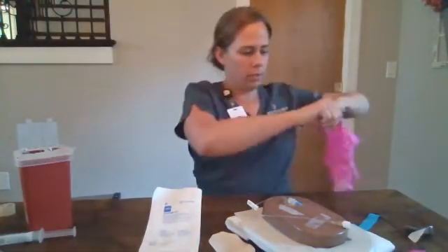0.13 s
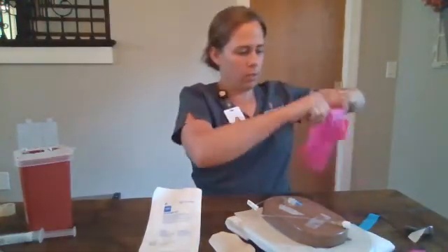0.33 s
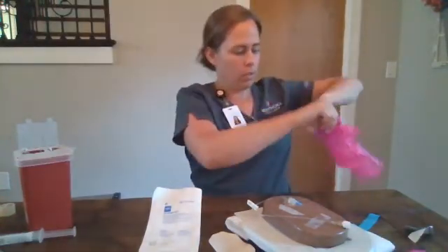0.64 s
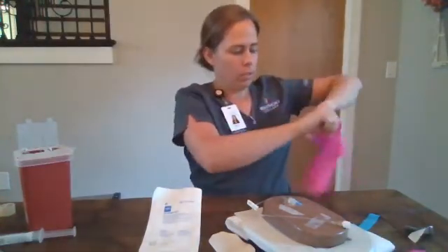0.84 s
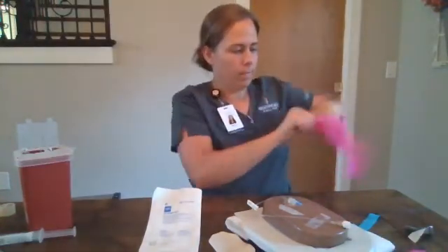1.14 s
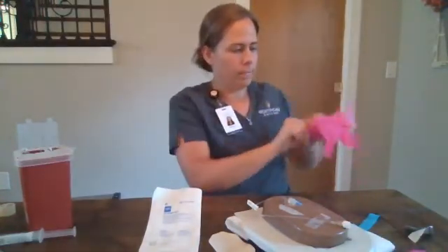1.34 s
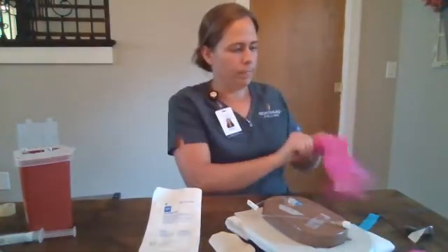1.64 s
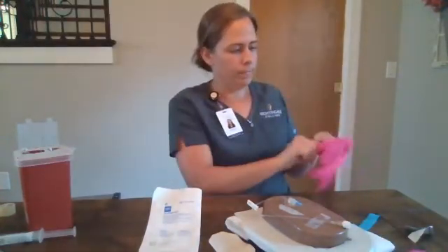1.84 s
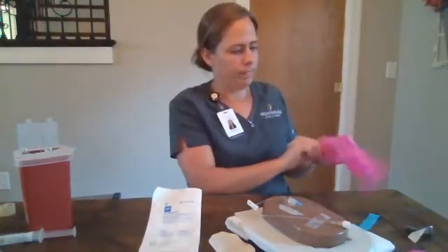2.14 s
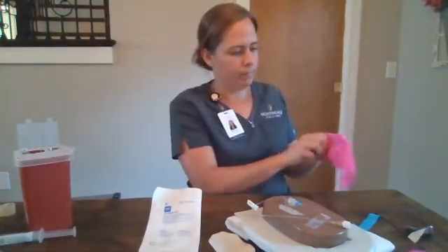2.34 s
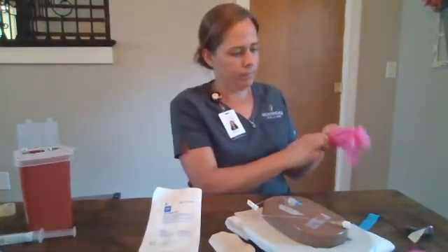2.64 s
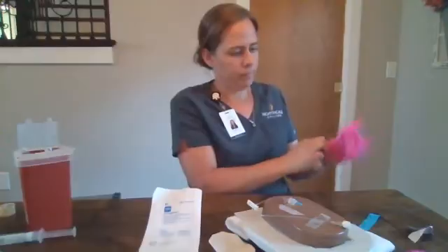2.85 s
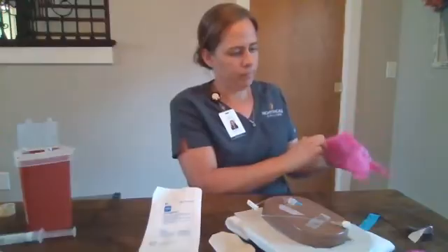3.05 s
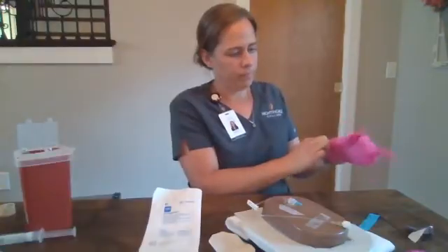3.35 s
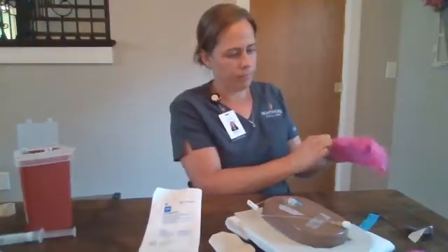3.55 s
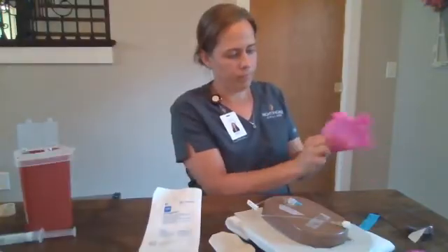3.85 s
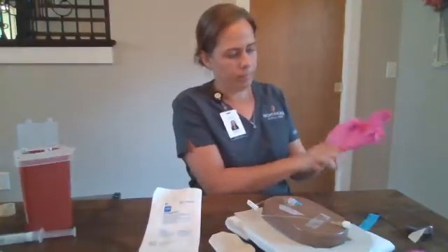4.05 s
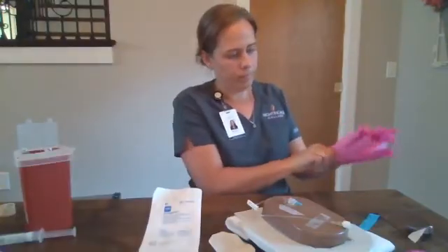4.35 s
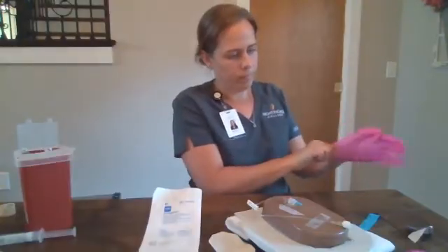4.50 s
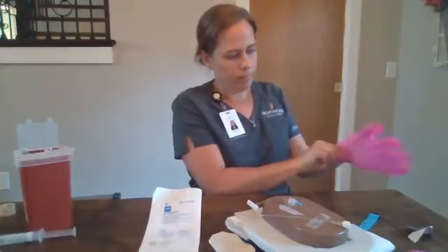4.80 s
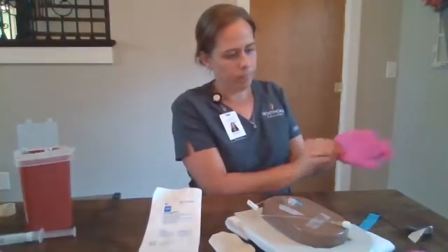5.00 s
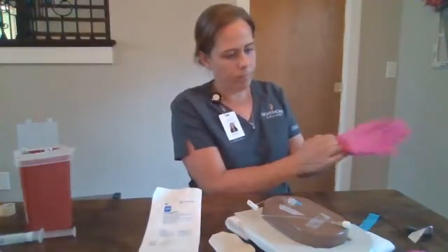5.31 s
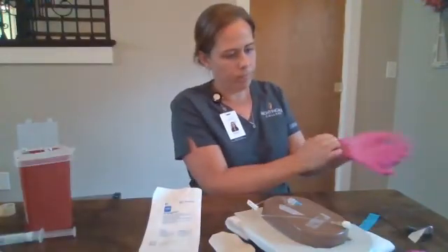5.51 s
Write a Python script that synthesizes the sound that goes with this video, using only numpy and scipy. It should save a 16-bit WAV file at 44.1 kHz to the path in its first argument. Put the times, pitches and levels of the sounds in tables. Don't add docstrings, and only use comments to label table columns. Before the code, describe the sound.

A quiet hard-walled room carries a faint wash of ventilation and low hum, heard by a camera microphone about two metres away. Sharp snaps of thin rubber open the scene at 0.05 and 0.2 s, then light rustling and another snap at 0.8 s. A tiny squeak comes at 1.2 s, followed by crackles and pops from 1.3 to 1.7 s. At 1.9 s the loudest snap cracks with a dull air thump, echoes and a trembling tail, while bubbles slip out until 2.25 s. From 2.5 s the glove sounds closer and drier: dense crackle and a hollow thump around 2.7-3.0 s, a low groan at 3.5 s, a short chatter at 3.65 s. Pops and flicks cluster at 4.0-4.5 s, with a bright tick at 4.54 s. After a sparser lull, a vigorous burst of snaps, thumps and ticks fills 5.15-5.55 s, then fades.

```python
import sys
import numpy as np
from scipy import signal
from scipy.fft import rfft, irfft
from scipy.io import wavfile
from scipy.ndimage import uniform_filter1d

SR = 44100
rng = np.random.default_rng(int(sys.argv[2]) if len(sys.argv) > 2 else 0)


def materialize(psi):
    bounded = np.clip(np.atleast_2d(psi).T, -1, 1)
    quanta = np.round(bounded * 32767).astype(np.int16)
    wavfile.write(sys.argv[1], SR, quanta)


def to_linear_factor(level_db):
    exponent = np.asarray(level_db, float) / 20
    return 10 ** exponent


N = 250047

# (frequency [Hz], level per Hz [dB])
FILM = [(530, -30), (900, 15), (2030, 10.5), (2560, 6), (3650, -3.5), (4070, -3), (5390, -11.5),
        (10400, -9), (15000, -7), (15900, -15), (16500, 7.5)]
SLACK_HIGH_DB = -25
IDLE_CRACKLE_DB, IDLE_HISS_DB, IDLE_FLUTTER_DB = -71.5, -60.5, -71.5


def evened(x):
    return x / np.sqrt(np.mean(x ** 2) + 1e-20)


def peaked(x, db):
    return to_linear_factor(db) * x / abs(x).max()


def add(mix, s, sound):
    part = mix[round(s * SR):][:len(sound)]
    part += sound[:len(part)]


def read(points, hz):
    f, value = np.transpose(points)
    return np.interp(np.log(hz + 1), np.log(f + 1), value)


def coloured(x, points):
    return irfft(rfft(x) * to_linear_factor(read(points, np.fft.rfftfreq(len(x), 1 / SR))), len(x))


def above(x, hz):
    return signal.sosfilt(signal.butter(4, hz, "high", fs=SR, output="sos"), x)


def resonate(x, hz, width):
    carrier = np.exp(2j * np.pi * np.cumsum(hz * np.ones(len(x))) / SR)
    r = np.exp(-np.pi * width / SR)
    return 2 * (carrier * signal.lfilter([1 - r], [1, -r], x / carrier + 1e-18)).real


def fuzzy(hz, width):
    return evened(resonate(resonate(rng.standard_normal(N), hz, width), hz, 3 * width))


def clicks(per_s, spread_db):
    size = to_linear_factor(spread_db * np.minimum(rng.exponential(1, N), 4)) * rng.choice([-1., 1.], N)
    return evened(size * (rng.random(N) < per_s / SR))


def swells(s, swell_s, db):
    late = (np.arange(0, N + 64, 64) / SR - s[:, None]) / abs(swell_s)[:, None]
    return to_linear_factor(2 * (db[:, None] - 14.5 * abs(late) ** 1.83))


def stretched(power):
    return np.sqrt(np.interp(np.arange(N) / 64, np.arange(len(power)), power))


def ventilation():
    # (frequency [Hz], level per Hz [dB])
    air = [(15, -31), (25, -20), (58, -34), (150, -5), (273, -7), (339, -25), (378, -5), (617, -9.5),
           (766, -16.5), (1120, -10.5), (2820, -16.5), (6550, -25), (7710, -70), (14800, -19.5),
           (16500, -55)]
    # (time [s], level [dB])
    draughts = [(.25, -59), (.55, -58.5), (.79, -70), (1.36, -63), (1.96, -56.5), (2.19, -60), (2.504, -49),
                (3.06, -52), (3.63, -60), (3.95, -59), (4.48, -62), (4.87, -62), (5.56, -57.5)]
    s, db = np.transpose(draughts)
    still_db = -69
    stirred = stretched(swells(s, 0.066 + 0 * s, db).sum(0) + to_linear_factor(2 * still_db))
    wander = evened(sum(np.sin(2 * np.pi * (f * np.arange(N) / SR + rng.random()))
                        for f in np.geomspace(.8, 5, num=8)))
    wash = evened(coloured(rng.standard_normal(N), air))
    low = wash - signal.filtfilt(*signal.butter(2, 115, "high", fs=SR), wash)
    rumble = to_linear_factor(-69 + 4 * wander) * evened(above(low, 36))
    hum = to_linear_factor(-66.5) * fuzzy(150.7, 11.8)
    standing = to_linear_factor(-3.5) * stirred * fuzzy(332, 8.4)
    return to_linear_factor(-65 + wander) * above(wash, 48.0) + hum + rumble + standing


def creases():
    # (time [s], peak level [dB], low ring [Hz], high ring [Hz], bright tick [dB])
    taut_flips = [(0.0536, -26, 4360, 6230, -5.5), (0.22, -25.5, 2350, 5000, -7.5),
                  (0.375, -47, 2460, 4670, -3.5), (0.549, -54, 2370, 5500, -2.5),
                  (0.7916, -30.5, 2960, 5590, -11), (1.3102, -47, 2600, 4450, -39),
                  (1.4575, -35.5, 2230, 6530, -4), (1.913, -15, 3010, 3890, -10),
                  (2.111, -44.5, 2620, 4180, -3.5), (2.496, -46.5, 2850, 3540, -19),
                  (2.526, -46.5, 1950, 4150, -9), (2.7685, -47, 2860, 4100, -17),
                  (2.9085, -46, 2000, 4540, -24), (3.1354, -38.5, 3150, 3470, -19),
                  (3.219, -36, 2170, 3550, -15), (3.4052, -37, 3440, 3040, -12.5),
                  (4.282, -48, 2430, 5300, -5), (4.338, -40, 2660, 3900, -7.5),
                  (4.3504, -32, 2530, 3380, -32), (4.4047, -38, 2410, 3670, -12),
                  (4.456, -37.5, 2760, 3570, -9), (4.5893, -49.5, 1430, 4360, 2),
                  (5.1455, -30.5, 1560, 3250, -12.5), (5.449, -44, 3060, 4260, -23)]
    # (time [s], peak
    # level [dB], ring [Hz], bright tick [dB])
    slack_pops = [(0.574, -39, 2520, -22), (0.9103, -55, 3180, -2), (1.055, -50, 3000, -1.5),
                  (1.305, -43, 2540, -45), (1.458, -29.5, 2900, -40), (1.6007, -36.5, 2780, -17),
                  (1.703, -24.5, 3480, -31), (1.7101, -27.5, 3000, -50), (1.831, -44, 3040, -6.5),
                  (2.4828, -56.5, 2710, 1.5), (2.7046, -26.5, 2740, -46), (2.9617, -31, 3140, -28),
                  (3.1814, -32.5, 3300, -15.5), (3.318, -46.5, 2500, -16), (3.6012, -35.5, 2650, -13),
                  (3.775, -29, 3440, -8), (3.917, -39, 3330, -42), (4.013, -37, 3080, -10.5),
                  (4.0333, -45, 2480, -11), (4.115, -34.5, 2670, -39), (4.1876, -40.5, 2800, -19),
                  (4.2107, -35, 3040, -38), (4.303, -43, 2420, -11), (4.377, -32.5, 2590, -10.5),
                  (4.5437, -42, 2150, -3), (5.164, -26, 2320, -35), (5.2283, -26.5, 2950, -38),
                  (5.2661, -19, 1500, -18), (5.4604, -33, 3400, -17.5), (5.5148, -31.5, 3110, -9)]
    taut = [(s, db, low, high, -5, tick, -3.5) for s, db, low, high, tick in taut_flips]
    slack = [(s, db, hz, hz * 1.35, SLACK_HIGH_DB, tick, -42) for s, db, hz, tick in slack_pops]
    return taut + slack


def drag():
    # (time of hardest drag [s], swell [s], crackle level [dB],
    # crackle centre [Hz], fine hiss over crackle [dB])
    strokes = [(0.0, 0.029, -54, 5340, 11), (0.598, 0.067, -51, 2480, -4), (1.093, 0.049, -46, 2975, -2),
               (1.28, 0.12, -53.5, 2900, -6), (1.307, 0.0055, -40, 2940, -11), (1.718, 0.07, -46, 3330, 0),
               (1.848, 0.033, -45.5, 2970, -4), (2.028, 0.055, -36.5, 3490, 2),
               (2.22, 0.06, -52, 3240, 2.5), (2.51, 0.035, -45, 3080, -5), (2.768, 0.076, -36, 2760, -4.5),
               (2.88, 0.11, -44, 2540, -1), (2.967, 0.033, -34.5, 3030, -4), (3.06, 0.089, -66, 3020, 6),
               (3.2, 0.016, -45, 3470, -15), (3.51, 0.058, -55, 2290, -0.5), (3.631, 0.04, -38.5, 2854, -3),
               (3.668, 0.018, -47, 3070, -8), (4.019, 0.034, -40.5, 2980, -6),
               (4.116, 0.046, -46, 2530, -5), (4.22, 0.029, -50, 2880, 0), (4.39, 0.082, -44.5, 2670, -22),
               (4.744, 0.051, -55.5, 2510, 12.5), (4.77, 0.062, -50, 2630, 3),
               (5.16, 0.086, -46.5, 2930, -4.5), (5.289, 0.058, -28.5, 3176, 1.5)]
    s, swell_s, db, hz, hiss_db = np.transpose(strokes)
    at, peak_db, low_hz, high_hz, high_db, tick_db, after_db = np.transpose(creases())
    late = np.arange(0, N + 64, 64) / SR - at[:, None]
    settle_s, settle_db_per_s = 0.00064, 435
    settle = np.clip(late / settle_s, 0, 1) * to_linear_factor(2 * (peak_db[:, None] - settle_db_per_s * abs(late)))
    power = np.vstack([swells(s, swell_s, db), settle * to_linear_factor(2 * after_db)[:, None]])
    hiss_share = np.r_[to_linear_factor(2 * hiss_db), to_linear_factor(2 * (tick_db - after_db + 8.5))]
    hiss = hiss_share @ power + to_linear_factor(2 * IDLE_HISS_DB)
    idle = to_linear_factor(2 * IDLE_CRACKLE_DB)
    total = power.sum(0) + idle
    ring_hz = np.r_[hz, np.where(high_db > -12, high_hz, low_hz)]
    centre = (ring_hz @ power + 2930 * idle) / total
    return stretched(total), stretched(centre) ** 2, stretched(hiss)


def rubbing():
    # (time of hardest push [s], swell [s], flutter level [dB])
    squeezes = [(0.07, 0.024, -42), (.23, 0.028, -48), (.55, 0.1, -56.5), (.83, 0.049, -46),
                (1.09, 0.032, -49.5), (1.468, 0.016, -37.5), (1.73, 0.066, -42.5), (1.95, 0.049, -38.5),
                (2.05, 0.057, -44.5), (2.13, 0.012, -46), (2.22, 0.066, -56), (2.51, 0.036, -54),
                (2.774, 0.091, -43.5), (2.945, 0.094, -34), (3.05, 0.07, -47), (3.188, 0.057, -38.5),
                (3.3, 0.26, -51.5), (3.42, 0.022, -47.5), (3.55, 0.11, -54.5), (3.65, 0.058, -41),
                (3.783, 0.022, -37.5), (4.03, 0.025, -48.5), (4.109, 0.029, -44.5), (4.25, 0.15, -49),
                (4.419, 0.11, -40.5), (4.78, 0.15, -53.5), (5.16, 0.044, -42), (5.287, 0.076, -29),
                (5.461, 0.072, -38), (5.528, 0.022, -33)]
    # (ratio to the centre [times], level [dB])
    patches = [(.58, -8.5), (.72, 1.5), (.86, 1.5), (1.0, -2), (1.17, -3), (1.4, -0.5), (1.7, -2),
               (2.05, 3)]
    # (frequency [Hz], level [dB])
    hollows = [(470, 1.5), (610, 11.5), (760, -0.5), (1150, 3.5)]
    crackle_gain, hz, hiss_gain = drag()
    flutter_gain = stretched(swells(*np.transpose(squeezes)).sum(0) + to_linear_factor(2 * IDLE_FLUTTER_DB))

    slips, patch = clicks(per_s=1500., spread_db=3.8), rng.integers(0, 4, N)
    retune_s, retune_share = .04, .05
    moment = np.minimum(np.arange(N) / SR / retune_s, 999).astype(int)
    shifts = rng.standard_normal((1000, len(patches)))[moment].T
    tuned = hz * (1 + retune_share * shifts)
    sides = [resonate(slips * (patch % 2 == k), hz, 2560) for k in range(2)]
    rings = sum(to_linear_factor(db) * resonate(sides[k % 2], tuned[k] * ratio, 140)
                for k, (ratio, db) in enumerate(patches))
    crackle = evened(rings) + 0.13 * evened(coloured(slips, FILM))

    fine = clicks(per_s=7800.0, spread_db=-32.0)
    hiss = above(coloured(1.02 * slips + fine, FILM), 4200)
    pops = clicks(per_s=1300., spread_db=2.)
    flutter = sum(to_linear_factor(db) * resonate(resonate(pops * (patch == k), f, 290), f, 1140)
                  for k, (f, db) in enumerate(hollows))
    body = crackle_gain * evened(crackle) + flutter_gain * evened(flutter)
    return to_linear_factor(-10.0) * body + hiss_gain * evened(hiss)


def squeaks():
    # (start [s], length [s], level [dB], first pitch [Hz], last pitch [Hz])
    squeals = [
        (0.0088, 0.035, -65, 5500, 5310),
        (1.223, 0.066, -60.5, 1543, 1560),
        (3.515, 0.078, -55, 327, 459),
        (3.67, 0.023, -56, 2950, 2970),
        (5.641, 0.024, -70, 3520, 3700),
    ]
    out = np.zeros(N)
    for s, length, db, first_hz, last_hz in squeals:
        u = np.linspace(0, 1, round(length * SR))
        hz = first_hz + (last_hz - first_hz) * u
        waver = evened(resonate(rng.standard_normal(len(u)), hz, 110))
        tone = np.sin(2 * np.pi * np.cumsum(hz) / SR) + 0.84 * waver
        add(out, s, to_linear_factor(db) * np.sin(np.pi * u ** 1.37) * tone)
    return out


def snaps():
    out, t = np.zeros((2, N)), np.arange(-512, 1024) / SR
    flip = (1 - np.exp(-np.maximum(t, 0) / .0006)) * to_linear_factor(-60 * t / .007)
    creak = .065 * to_linear_factor(-60 * abs(t) / .027)
    motion = flip + creak
    for s, db, low_hz, high_hz, high_db, tick_db, _ in creases():
        z = rng.standard_normal(len(t))
        grit = z * abs(z)
        cracks = (grit + 12 * (abs(t - .0004) < .5 / SR)) * motion
        low = resonate(resonate(cracks, low_hz, 580), low_hz, 1400)
        low = peaked(low, db - 0.3 * (high_db - SLACK_HIGH_DB))
        high = resonate(resonate(cracks, high_hz, 0.12 * high_hz), high_hz, 5900)
        high = peaked(high, db + high_db + 6.0)
        wide = peaked(above(coloured(grit * motion, FILM), 1400), db - 5 + .4 * tick_db)
        tick = peaked(above(cracks, 12100), db + tick_db + 17.5)
        held_out = s > 2.3
        dry_row = int(high_db < -12 or held_out)
        add(out[dry_row], s + t[0] - .0003, low + high + wide + tick)
    return out


def thump(hz, db):
    t = np.arange(2048) / SR
    push = rng.standard_normal(len(t)) * to_linear_factor(-60 * t / 0.024)
    push[[0, round(SR / hz)]] += 6, 9
    t60 = 12 / hz
    return peaked(resonate(resonate(push, hz, 1.75 / t60), hz, 780), db - 1)


def thumps():
    # (time [s], peak level [dB], ring [Hz])
    pocket_pops = [(0.054, -34.5, 506), (0.22, -49.5, 342), (0.791, -44, 1000), (0.877, -45, 586),
                   (1.458, -41.5, 545), (1.709, -37, 846), (1.912, -22, 640), (2.047, -36, 627),
                   (2.116, -41, 670), (2.186, -38, 467), (2.726, -38.5, 670), (2.869, -41, 610),
                   (2.926, -24.5, 602), (3.18, -36.5, 408), (3.219, -34, 535), (3.405, -44, 930),
                   (3.6, -32, 556), (4.103, -49, 570), (4.211, -44, 646), (4.275, -43.5, 655),
                   (4.334, -39.5, 616), (4.376, -39.5, 480), (4.407, -35.5, 707), (4.454, -30, 687),
                   (4.755, -43, 438), (5.157, -34, 504), (5.264, -32, 533), (5.424, -36.5, 507),
                   (5.449, -30, 592), (5.514, -26.5, 523)]
    out = np.zeros(N)
    for s, db, hz in pocket_pops:
        add(out, s, thump(hz, db))
    return out


def shivers():
    # (time [s], level [dB], band centre [Hz], band width [Hz], decay t60 [s])
    trembles = [(0.056, -61, 6430, 1000, 0.55), (0.806, -55.5, 1150, 230, 0.3),
                (1.465, -53, 2600, 795, 0.29), (1.922, -44, 2580, 500, 0.8), (1.922, -42, 4270, 870, 1),
                (1.925, -54, 1400, 360, 0.51), (3.6, -51, 3610, 350, 0.044), (3.922, -61, 3400, 200, 0.36),
                (4.1, -52.5, 2900, 140, 0.14), (4.455, -54, 1490, 313.2, 0.2), (4.87, -61, 167, 37.96, 0.2),
                (5.262, -41, 760, 260, 0.21)]
    out, slips = np.zeros(N), clicks(per_s=7100.0, spread_db=6.5)
    t = np.arange(12000) / SR
    for s, db, hz, width, t60 in trembles:
        part = slips[round(s * SR):][:len(t)]
        band = evened(resonate(resonate(part, hz, width), hz, width))
        fade = np.minimum(t / 0.0012, 1) * signal.windows.tukey(2 * len(t), .6)[len(t):]
        add(out, s, to_linear_factor(db - 60 * t / t60) * fade * band)
    return out


def damped_rings(rows, trim_db):
    out, t = np.zeros(N), np.arange(4096) / SR
    for s, db, hz, t60 in rows:
        ring = np.sin(2 * np.pi * hz * t) + to_linear_factor(-10.5) * np.sin(2 * np.pi * 1.75 * hz * t)
        attack = 1 - np.exp(-t * hz / 1.17)
        add(out, s, peaked(ring * attack * to_linear_factor(-60 * t / abs(t60)), db + trim_db))
    return out


def cracks():
    # (time [s], peak level [dB], ring [Hz], decay t60 [s])
    fold_cracks = [(0.0635, -36, 4300, .006), (0.076, -33, 4200, 0.0056), (1.3105, -36, 3700, 0.0043),
                   (1.469, -34, 6300, 0.0065), (1.9135, -15, 3670, .003), (1.9175, -17, 4400, .006),
                   (1.9275, -23, 3900, .005), (3.1805, -27, 2600, 0.0018), (4.4565, -28.5, 2420, .003),
                   (5.146, -31, 2020, 0.0033), (5.1645, -26.5, 1540, 0.007), (5.188, -38, 3000, .004),
                   (5.266, -16.5, 2020, 0.0016), (5.281, -20.5, 1600, 0.0081),
                   (5.2845, -23.5, 1520, 0.0075), (5.3065, -27, 1620, .005)]
    return damped_rings(fold_cracks, trim_db=-2)


def flicks():
    # (time [s], peak level [dB], ring [Hz], decay t60 [s])
    freed = [(1.1837, -46, 2780, 0.008), (1.2585, -38.5, 2450, 0.008), (1.269, -40, 2400, 0.008),
             (1.2804, -37, 2680, 0.008), (1.2885, -39, 2230, 0.008), (1.3017, -31.5, 2480, 0.0076),
             (1.3102, -41, 2400, 0.011), (2.7214, -34, 2920, 0.008), (2.7374, -35, 4300, 0.008),
             (2.7434, -31.5, 3840, 0.007), (2.7724, -30, 2980, 0.008), (2.7804, -32, 3900, 0.008),
             (2.7854, -30, 3010, 0.008), (2.7934, -35, 2980, 0.0074), (2.8284, -45, 2840, 0.008),
             (2.9467, -34, 2870, 0.008), (2.9654, -36, 2920, 0.0096), (3.182, -37, 3730, 0.006),
             (3.2186, -40, 3560, 0.0065), (3.3019, -51, 2370, 0.008), (3.3603, -43, 2300, 0.0062),
             (3.4951, -52, 2930, 0.008), (3.5174, -49, 3370, 0.008), (3.6194, -39, 3330, 0.0091),
             (3.6391, -34, 3020, 0.011), (3.917, -28.5, 3330, 0.01), (3.9274, -55, 3330, 0.008),
             (4.0123, -33, 3240, 0.011), (4.0327, -37, 2300, 0.0099), (4.2314, -42, 3000, 0.008),
             (4.35, -28.5, 3770, 0.008), (4.376, -29.5, 2410, 0.011), (4.4059, -31, 3670, 0.008),
             (4.4304, -33.5, 2800, 0.0086), (4.6947, -46, 2320, 0.0068), (5.1564, -31, 2220, 0.0072),
             (5.1637, -25, 2220, 0.012), (5.2276, -31, 3270, 0.0079), (5.2824, -26, 3400, 0.008),
             (5.2864, -22, 3230, 0.0068), (5.3054, -33, 3200, 0.008), (5.3244, -34, 3650, 0.008),
             (5.4627, -31.5, 2980, 0.01)]
    return damped_rings(freed, trim_db=-2)


def chatters():
    # (start [s], length [s], peak level [dB], slip rate [per s], ring [Hz])
    cuff_runs = [
        (1.465, .014, -44, 500, 2900),
        (3.657, 0.019, -35, 430, 3050),
        (5.259, .008, -33, 540, 3050),
    ]
    # (ratio [times], width [Hz], level [dB])
    parts = [(1, 260, 0), (2.1, 700, -20), (.7, 300, -14), (1.22, 300, -9)]
    out = np.zeros(N)
    for s, length, db, per_s, hz in cuff_runs:
        z, slips = rng.standard_normal(40), np.zeros(4096)
        at = (np.arange(40) + .12 * z) / per_s
        inside = (at >= 0) & (at < length)
        growth = .6 + .5 * at[inside] / length
        slips[(at[inside] * SR).astype(int)] = growth * to_linear_factor(1.5 * z[::-1][inside])
        ring = sum(to_linear_factor(part_db) * evened(resonate(resonate(slips, k * hz, width), k * hz, 3 * width))
                   for k, width, part_db in parts)
        add(out, s, peaked(ring, db + 6.5))
    return out


def bubbles():
    # (time [s], peak level [dB], ring [Hz], decay t60 [s])
    escapes = [(1.467, -43.5, 541, .04), (2.031, -40, 708, .03), (2.063, -39, 580, .046),
               (2.086, -43, 636, .034), (2.094, -37, 500, .031), (2.134, -40, 704, 0.044),
               (2.177, -40, 416, .03), (2.196, -39, 458, 0.049), (2.234, -42, 674, .057),
               (2.254, -46.5, 636, .05), (2.884, -34, 580, .025), (2.918, -34, 603, .03),
               (2.94, -29, 703, .025), (2.946, -27.5, 606, .042), (2.954, -23, 447, 0.047),
               (2.967, -34, 410, .021), (3.567, -37, 412, .036), (3.594, -38, 514, 0.027),
               (4.185, -45, 608, .03), (4.258, -48, 585, .03), (4.303, -38.5, 564, .04),
               (4.419, -43, 496, 0.041), (4.434, -30.5, 467, 0.06), (4.585, -44.5, 634, 0.066),
               (4.789, -41.5, 508, .058), (5.136, -37, 600, .02), (5.206, -37.5, 520, .04),
               (5.284, -27, 547, 0.031), (5.302, -24, 540, 0.033), (5.324, -31, 640, .029),
               (5.461, -25, 550, 0.023), (5.52, -29.5, 420, 0.036), (5.535, -29.5, 554, .04)]
    return damped_rings(escapes, trim_db=-4)


def pricks():
    # (time [s], peak level [dB])
    peels = [(1.4695, -36), (2.7242, -44), (2.7804, -38), (2.8184, -45), (2.8304, -45), (2.8669, -41),
             (2.9083, -45), (2.9317, -45), (2.9894, -26), (3.0114, -51), (3.1793, -26), (4.3365, -36),
             (4.3755, -35), (4.4055, -38), (4.43, -44), (4.4553, -38), (4.5426, -19.5), (4.7257, -29),
             (4.901, -34), (4.9427, -38), (5.0884, -58), (5.1564, -42), (5.1642, -35), (5.2106, -46),
             (5.227, -44), (5.2445, -37), (5.3214, -32), (5.3384, -32), (5.3457, -19.5), (5.3814, -49),
             (5.4615, -45), (5.5144, -37)]
    out, t = np.zeros(N), np.arange(4096) / SR
    prick = above(np.cos(2 * np.pi * 21000 * t ** .5 * 0.072) * to_linear_factor(-60 * t / 0.0088), 11500)
    for s, db in peels:
        add(out, s, peaked(prick, db - 2))
    return out


def knocks():
    # (time [s], peak level [dB], ring [Hz])
    knuckles = [(1.909, -33.5, 416), (2.183, -46, 420), (2.96, -31.5, 420), (3.027, -43, 310),
                (3.404, -48.5, 248), (3.772, -55, 350), (4.205, -49, 252), (4.455, -39.5, 249),
                (4.777, -43, 281), (4.813, -50, 297), (5.35, -51, 223), (5.513, -29, 442)]
    out = np.zeros(N)
    for s, db, hz in knuckles:
        add(out, s, thump(hz, db))
    return out


def room(x):
    # (delay [s], level [dB])
    walls = [(.0035, -10), (.0052, -11), (.0102, -6.5), (.0141, -13), (.0225, -14), (.031, -18)]
    # (frequency [Hz], t60 [s])
    decay = [(250, 0.2), (1000, 0.27), (4000, 0.29), (9000, 0.47), (15000, 0.21)]
    early = np.zeros(2048)
    for s, db in walls:
        early[round(s * SR)] = to_linear_factor(db)
    dull = signal.lfilter([.7], [1, -.3], x)
    out = x + signal.oaconvolve(dull, early)[:N]
    turning = np.pi * 7 * np.arange(N) / SR
    blur_hz = 200
    for k in range(3):
        taps, slots = np.zeros(30000), np.arange(392, 29980, 12)
        taps[slots + rng.integers(0, 12, len(slots))] = rng.choice([-1., 1.], len(slots))
        hz, t, z = signal.stft(taps, SR, nperseg=256)
        tail = signal.istft(z * to_linear_factor(-60 * t / read(decay, hz)[:, None]), SR, nperseg=256)[1]
        feed = x * np.sqrt(2 / 3) * np.cos(turning + k * np.pi / 3)
        wet = to_linear_factor(-3) * signal.fftconvolve(feed, tail / np.linalg.norm(tail))[:N]
        bright = wet - signal.filtfilt(*signal.butter(2, 4500, fs=SR), wet)
        phase = np.cumsum(rng.standard_normal(N)) * np.sqrt(2 * np.pi * blur_hz / SR)
        out += wet + bright * (np.sqrt(2) * np.cos(phase) - 1)
    return out


def noise_fill(mono):
    # (time [s], low edge [Hz], high edge [Hz])
    filled = [(.25, 14200, 16000), (1.46, 11900, 16000), (1.46, 8900, 9900), (1.935, 8200, 15300),
              (2.5, 11900, 12800), (3.4, 15000, 16000), (4.33, 10400, 12800), (4.43, 13400, 16000),
              (4.65, 8200, 9800), (4.65, 14500, 16000), (5.14, 14500, 16500), (5.22, 15200, 16000),
              (5.275, 11900, 14500), (5.275, 9600, 11000), (5.3, 11900, 13200)]
    hz, t, z = signal.stft(mono, SR, nperseg=512)
    mask = sum((abs(t - s) < .013) & (hz[:, None] > lo) & (hz[:, None] < hi) for s, lo, hi in filled) > 0
    smooth = uniform_filter1d(uniform_filter1d(abs(z) ** 2, size=7, axis=1), size=9, axis=0)
    chance = rng.standard_normal(z.shape) + 1j * rng.standard_normal(z.shape)
    return signal.istft(0.55 * mask * np.sqrt(smooth + 1e-20) * chance, SR, nperseg=512)[1][:N]


def scene():
    air = ventilation()
    rub = rubbing()
    taut, slack = snaps()
    dull = thumps() + knocks()
    near = squeaks() + slack + cracks() + flicks() + chatters() + bubbles() + pricks()
    close = 0.68 * rub + 0.34 * near + 0.53 * dull
    into_room = taut + shivers() + 0.45 * rub + 0.6 * near + 0.61 * dull
    mono = close + room(into_room) + air
    return np.array([mono, mono])


def top_cut(x):
    return signal.sosfilt(signal.butter(12, 16680, fs=SR, output="sos"), x)


def record(dry):
    low_pass = signal.firwin(255, 15900, window=("kaiser", 9), fs=SR)
    band = signal.oaconvolve(dry, low_pass[None], "same")
    mix = band + noise_fill(band[0]) * [[1], [-1]]
    return top_cut(mix)


dry = scene()
out = record(dry)
materialize(out)
```